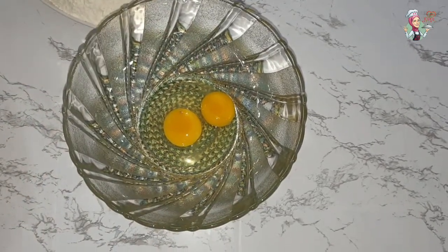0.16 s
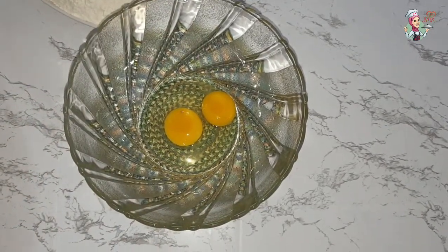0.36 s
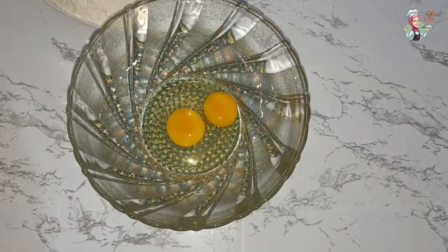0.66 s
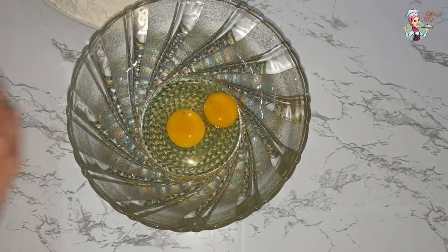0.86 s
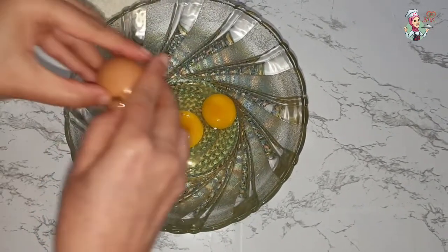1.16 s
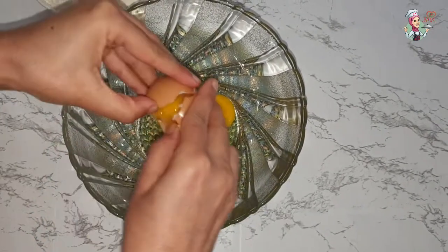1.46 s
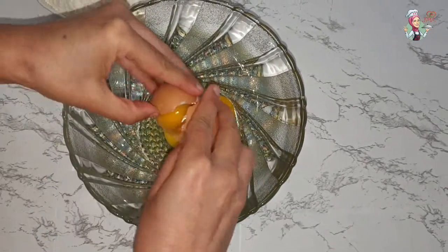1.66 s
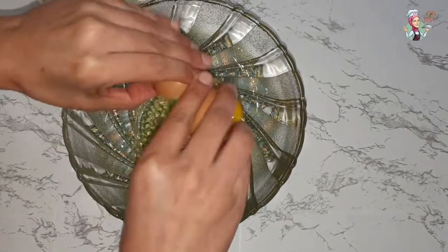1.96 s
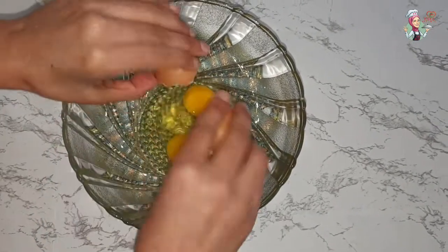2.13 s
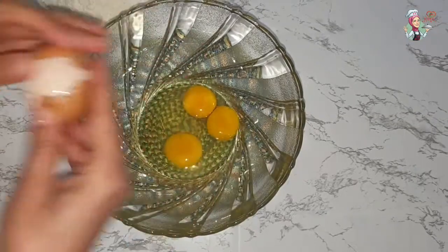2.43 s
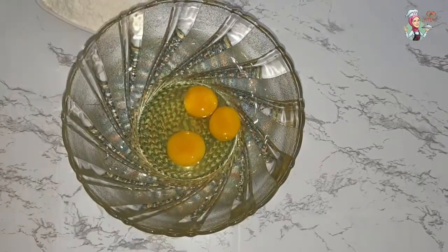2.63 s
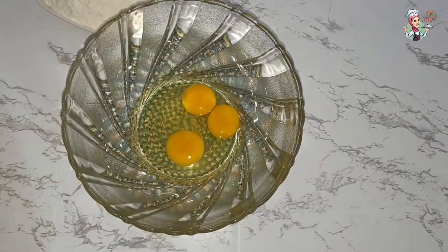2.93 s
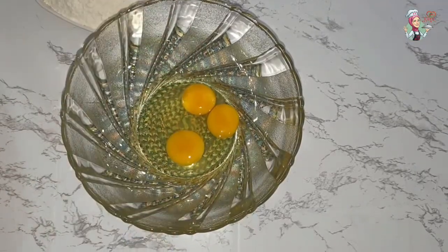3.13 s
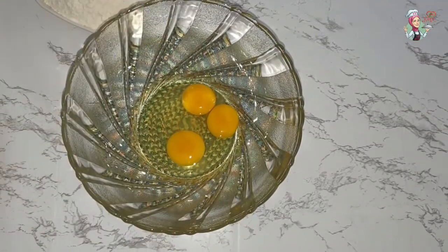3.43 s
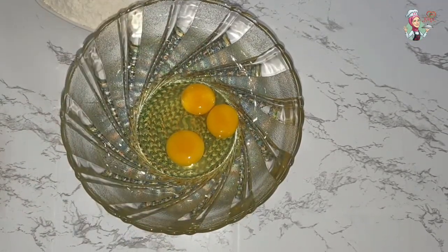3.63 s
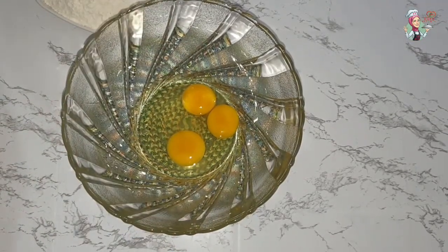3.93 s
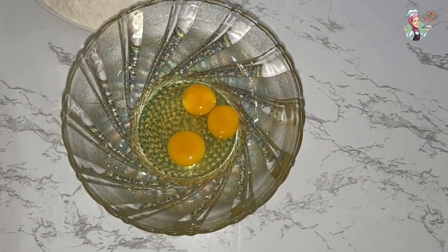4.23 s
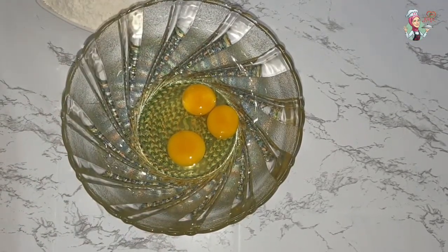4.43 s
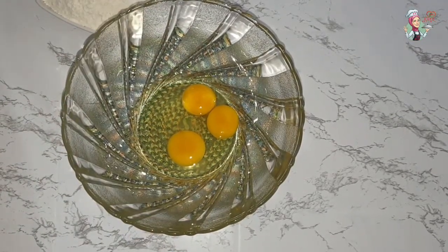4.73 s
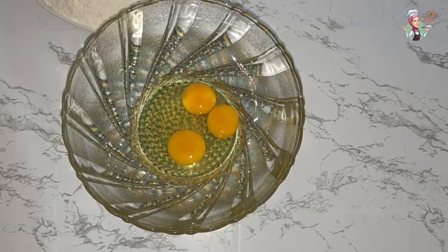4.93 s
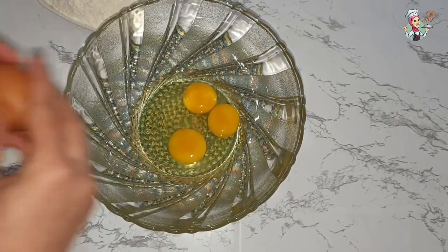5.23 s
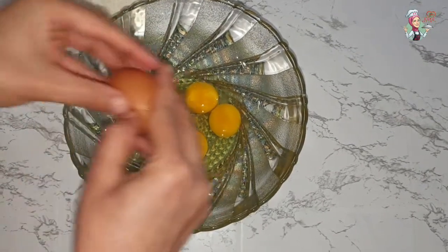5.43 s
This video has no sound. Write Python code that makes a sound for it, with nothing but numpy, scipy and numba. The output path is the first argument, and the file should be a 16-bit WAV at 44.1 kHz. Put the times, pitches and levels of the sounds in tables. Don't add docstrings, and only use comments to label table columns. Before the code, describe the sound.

Brittle close-up egg cracking in bursts with dry crackles, fading to small crunches, then three weakening taps on stone in a hard little kitchen.

```python
import sys
import numpy as np
from scipy import signal
from scipy.fft import rfft, irfft
from scipy.io import wavfile
from scipy.ndimage import uniform_filter1d
from numba import njit

SR = 44100
rng = np.random.default_rng(int(sys.argv[2]) if len(sys.argv) > 2 else 0)


def generate_wav(signal):
    frames = np.transpose(np.atleast_2d(signal))
    scaled = np.clip(frames, -1, 1) * 32767
    pcm = np.round(scaled).astype(np.int16)
    wavfile.write(sys.argv[1], SR, pcm)


def nominal_scale(level):
    x = np.asarray(level, float) / 20
    return 10 ** x


N = 246078
TIME = np.arange(N) / SR
COUNTER_HZ = (61, 124.7)
SHELL_EDGE_HZ = 2200


def unit(x):
    return x / np.sqrt(np.mean(x ** 2) + 1e-30)


def peak(x, db):
    return x * nominal_scale(db) / np.abs(x).max()


def colour(x, points):
    hz, db = np.transpose(points)
    axis_hz = np.fft.rfftfreq(x.shape[-1], 1 / SR) + 1
    gain = nominal_scale(np.interp(np.log(axis_hz), np.log(hz), db))
    return irfft(rfft(x) * gain, x.shape[-1])


@njit
def svf(x, hz, q):
    y, b, l = np.empty(len(x)), 0., 0.
    for i in range(len(x)):
        g = np.tan(np.pi * hz[i] / SR)
        v = (b + g * (x[i] - l)) / (1 + g * (g + 1 / q))
        b, l, y[i] = 2 * v - b, l + 2 * g * v, v / q
    return y


def band(x, hz, q):
    return svf(x + 1e-18, np.clip(hz * np.ones(len(x)), 20, .42 * SR), float(q))


def above(x, hz):
    return signal.sosfilt(signal.butter(4, hz, "high", fs=SR, output="sos"), x)


def waver(count, size):
    smooth = uniform_filter1d(rng.standard_normal(count), size=size)
    return unit(uniform_filter1d(smooth, size=size))


def swell(s, rise, fall, db):
    return nominal_scale(db - 29.5 * np.maximum((s - TIME) / rise, (TIME - s) / fall))


def add(out, s, sound):
    i = int(s * SR)
    sound = sound[:, :N - i]
    out[:, i:i + sound.shape[1]] += sound


# t/s, f/Hz
SHELL_RESONANCE = [(0.4, 1900), (0.54, 1404), (0.78, 2001), (1.4, 1600), (1.5, 2350), (1.75, 2520),
                   (2.1, 2150), (2.4, 1900), (2.72, 1680), (3.1, 1480), (3.25, 2170), (3.44, 1900),
                   (3.55, 2040), (3.68, 1900), (3.9, 1955), (4.05, 1900), (4.2, 2293), (5.5, 1830)]
# t/s, snap level/dB, shell body f/Hz, body level/dB
RINGING_BREAKS = [(0.392, -34.5, 1770, -34.5), (0.4026, -12, 1750, -11.5), (0.4898, -26.5, 1800, -22),
                  (0.508, -13.5, 1556, -11.5), (0.5196, -20.5, 1260, -12.5), (0.5292, -15.5, 1720, -17),
                  (0.5549, -13.5, 1670, -43), (0.5665, -16.5, 1420, -37), (0.5778, -18, 1430, -23),
                  (0.7536, -35, 2600, -33.5), (1.0201, -40, 896, -55), (1.057, -39, 866, -47),
                  (2.3621, -6.5, 1940, -23.5), (2.4014, -28.5, 1860, -37), (2.4173, -19, 1650, -23),
                  (2.4277, -16.5, 1780, -17.5), (2.7038, -17.5, 1624, -19.5), (2.7507, -13.5, 1666, -26),
                  (3.2127, -36, 1080, -22.5), (3.2214, -50, 1110, -22.5), (3.3665, -16.5, 2260, -44),
                  (3.4227, -28.5, 1650, -17.5), (3.532, -38, 2200, -32), (3.6601, -21.5, 1720, -35),
                  (3.8676, -23.5, 1690, -36), (4.041, -28.5, 2210, -42.5), (4.147, -28, 2040, -25),
                  (4.1544, -31, 2340, -34), (4.1889, -33, 1740, -38), (4.2398, -27.5, 2590, -33.5)]
# t/s, snap level/dB, snap centre f/Hz
OPEN_SPLINTERS = [(0.6841, -30, 12500), (1.982, -46, 8000), (2.137, -39.5, 6620), (1.0922, -33, 6540),
                  (1.1433, -30.5, 10830), (5.502, -43, 6500), (1.4386, -34.5, 7100), (1.457, -28.5, 8000),
                  (1.4846, -6.5, 10800), (1.4984, -11, 8950), (1.5107, -3, 7070), (1.5978, -25.5, 8850),
                  (1.6721, -37, 4400), (1.7231, -9.5, 7830), (1.7868, -36, 10100), (1.8126, -29.5, 10400),
                  (1.8387, -34, 3480), (1.8781, -38.5, 6050), (1.917, -30.5, 7780), (2.0237, -29, 6700),
                  (2.1163, -26, 7190), (2.3023, -34.5, 10870), (2.3895, -22.5, 9860), (2.4434, -11, 9900),
                  (2.4634, -19, 5200), (2.6187, -25, 11200), (2.6324, -22, 11100), (2.7321, -17, 9800),
                  (2.7607, -17.5, 5800), (3.949, -27, 5100)]


def cracks(out, kitchen):
    rows = []
    for s, snap_db, body_hz, body_db in RINGING_BREAKS:
        snap_hz = 5800 * np.exp(0.57 * rng.standard_normal())
        rows.append((s, snap_db, snap_hz, body_hz, body_db))
    for s, snap_db, snap_hz in OPEN_SPLINTERS:
        body_hz = np.interp(s, *np.transpose(SHELL_RESONANCE))
        rows.append((s, snap_db, snap_hz, body_hz, snap_db - 27.5))

    t = TIME[:1024]
    splitting = (np.exp(-t / .0004) + .12 * np.exp(-t / .004)) * (1 - np.exp(-t / .0003))
    for s, snap_db, snap_hz, body_hz, body_db in rows:
        fracture = rng.standard_normal(len(t)) * splitting
        snap = band(fracture, snap_hz, 2.1) + 0.27 * band(fracture, 8000, 0.85)
        snap = above(snap, SHELL_EDGE_HZ)
        ring = band(band(fracture, body_hz, 6), body_hz, 0.91)
        add(out, s, kitchen(peak(snap, snap_db + 8.5) + peak(ring, body_db + 10.0), s))


# t/s, length/s, crackle level/dB, body level/dB, hollow level/dB
CRUSHED = [(0.382, 0.012, -37.5, -40.5, -51.5), (0.51, .075, -33, -21, -20.5),
           (1.488, 0.025, -24.5, -58, -43), (2.622, 0.11, -41.5, -41.5, -67),
           (2.708, .065, -37, -25.5, -54)]
SQUEEZED = [(1.02, 0.16, -41.5, -85, -51.5), (1.285, .075, -50.5, -76.5, -61.5),
            (1.57, 0.087, -55.5, -37.5, -62), (2.368, .135, -23, -26.5, -35.5), (3.8, 0.22, -42, -41, -87),
            (0.8, 0.31, -57, -84.5, -71.5), (2.1, 0.14, -62, -50, -94)]
PEELED = [(0.403, .092, -39.5, -24.5, -39.5), (1.44, .036, -52, -73.5, -60), (1.675, .04, -32, -69, -67),
          (1.74, .2, -42, -39.5, -68), (0.755, .07, -57, -46, -55.5), (2.023, .17, -45.5, -47.5, -70.5),
          (2.303, .04, -57, -84.5, -81), (4.035, .045, -43, -29, -63), (4.146, .13, -45, -42, -40)]
GRIPPED = [(3.03, 0.23, -58.5, -68, -86), (3.213, 0.27, -30, -35.5, -39.5), (3.366, 0.079, -25.5, -22, -72),
           (3.47, .14, -34.5, -30, -39), (3.61, 0.16, -39.5, -46, -47.5), (5.41, 0.32, -61.5, -59, -82.5)]


def crunch(out, kitchen):
    swarms(out, kitchen, CRUSHED, start_db=-3.2, end_db=2.5, peak_at=.4, rate=4000, scatter_db=5.5)
    swarms(out, kitchen, SQUEEZED, start_db=-8.5, end_db=-11.5, peak_at=.43, rate=2500, scatter_db=6)
    swarms(out, kitchen, PEELED, start_db=-1, end_db=-11, peak_at=.11, rate=1500, scatter_db=6)
    swarms(out, kitchen, GRIPPED, start_db=-.25, end_db=-11, peak_at=1, rate=7000, scatter_db=4.5)


def swarms(out, kitchen, rows, start_db, end_db, peak_at, rate, scatter_db):
    for s, length, crackle_db, body_db, hollow_db in rows:
        t = np.arange(0, length, 1 / SR)
        n = len(t)
        sizes = nominal_scale(scatter_db * np.minimum(rng.exponential(size=n), 3.0))
        sizes = sizes * np.sign(rng.standard_normal(n))
        grains = unit((rng.random(n) < rate / SR) * sizes + 1e-9) + 0.033 * rng.standard_normal(n)

        crackle_hz = 6850 * np.exp(0.1 * waver(n, size=1200))
        crackle = band(grains, crackle_hz, 3.9) + 2.0 * band(band(grains, 5800, 0.3), 5300, 0.04)
        crackle = unit(above(crackle, SHELL_EDGE_HZ))
        crackle = crackle * nominal_scale(2 * waver(n, size=350))
        body_db = body_db + 2 * waver(n, size=600)

        body_hz = np.interp(s + t, *np.transpose(SHELL_RESONANCE))
        body_hz = body_hz * (1 + .08 * waver(n, size=500))
        body = band(grains, body_hz, 2.0) + 1.3 * band(grains, body_hz, 9)
        body = unit(band(body, body_hz, 1.7))
        hollow = unit(band(band(grains, 1080, 0.8), 1080, 0.97))

        edges = np.minimum(1, np.minimum(t, length - t) / 0.003)
        turns = [0, np.clip(peak_at, .02, .98), 1]
        effort = edges * nominal_scale(np.interp(t / length, turns, [start_db, 0, end_db]))
        layers = crackle * nominal_scale(crackle_db - 1.0) + body * nominal_scale(body_db - 4.0) + hollow * nominal_scale(hollow_db)
        add(out, s, kitchen(effort * layers, s))


# t/s, blow level/dB, shell f/Hz, bowl ring level/dB, brightness level/dB
EGG_TAPS = [
    (4.302, -5.5, 1790, 1.5, 0.5),
    (4.47, -8.5, 2300, -12, -3.5),
    (4.61, -10.5, 1800, -23.5, 3),
]
# f/Hz, width/Hz, level/dB, t60/s
BOWL_AND_SLAB = [(1229, 45, 2, 0.17), (900, 440, -0.5, 0.066), (498.4, 170, -26, 0.017),
                 (1900, 420, -16, 0.027)]
# f/Hz, level/dB
TICK_COLOUR = [(200, 4.5), (482, -28), (1210, 4), (2800, -11), (3690, -11), (5840, -11.5), (8740, -32),
               (16000, -33)]


def knocks(out, kitchen):
    t = TIME[:14000]
    push = np.exp(-t / 0.00074) + 0.081 * np.exp(-t / 0.029)
    for s, blow_db, shell_hz, ring_db, bright_db in EGG_TAPS:
        jolt = rng.standard_normal(len(t))
        hit = jolt * push
        tick = colour(jolt, [(100, -46.5)] + TICK_COLOUR + [(20000, -62.5)]) * push
        shell = band(hit, shell_hz, 5) + .8 * band(hit, 1.45 * shell_hz, 5)
        bright = band(band(hit, 6000, 2.0), 6000, 1.0) + .25 * band(hit, 12000, 1.5)
        ring = 0
        for hz, width_hz, db, t60 in BOWL_AND_SLAB:
            rough = 1.6 * unit(band(jolt, hz, hz / width_hz))
            ring = ring + nominal_scale(db - 60 * t / t60) * (np.sin(2 * np.pi * hz * t) + rough)
        thud = np.sin(2 * np.pi * COUNTER_HZ[0] * t) * np.exp(-t / 0.01)
        thud = band(thud, COUNTER_HZ[0], 0.7)
        blow = peak(tick, 3.2) + peak(shell, -1) + peak(bright, bright_db) + peak(ring, ring_db)
        thud_db = blow_db + 2 * ring_db - 31
        add(out, s, kitchen(above(blow, 110) * nominal_scale(blow_db) + thud * nominal_scale(thud_db), s))


# t/s, effort level/dB
HAND_EFFORT = [(0, -6), (0.36, -12.5), (0.56, 17.5), (0.73, -10), (1.0, 2), (1.5, 6), (1.68, -14.5),
               (1.8, -9), (2.3, -11.5), (2.45, 2), (2.9, -6), (3.21, 5), (3.47, 0), (3.55, 14), (3.95, 0.5),
               (4.63, 13.5), (4.85, -19.5), (5.58, 4)]
STIR_LEVEL = (-70, -75.5, -70)
STIR_GAIN = (0.13, .6, 1.0)
# t/s, rise/s, fall/s, low mode level/dB, second mode level/dB
HAND_LEANS = [(0.11, 0.18, 0.33, -52, -94), (2.43, 0.19, 0.25, -54, -70.5), (3.522, 0.0083, 0.23, -49, -48),
              (3.598, .08, 0.087, -44.5, -43.5), (4.175, .03, .12, -39.5, -36.5),
              (4.22, 0.046, .14, -40, -37), (4.312, .06, 0.044, -35, -43.5)]
# f/Hz, sharpness (Q), level/dB
SKIN_RUB = [(223, 0.83, 4.5), (330, 22, 1), (433, 11, -6)]


def shake():
    effort_db = np.interp(TIME, *np.transpose(HAND_EFFORT))
    *stirs, rub = (nominal_scale(db + gain * effort_db) for db, gain in zip(STIR_LEVEL, STIR_GAIN))
    out = 0
    for k, hz in enumerate(COUNTER_HZ):
        leans = sum(swell(s, rise, fall, dbs[k]) for s, rise, fall, *dbs in HAND_LEANS)
        mode_hz = hz * (1 + 0.12 * waver(N, size=1500))
        mode = unit(np.sin(2 * np.pi * np.cumsum(mode_hz) / SR))
        loose = [unit(band(band(rng.standard_normal(N), hz, 0.99), hz, 0.99)) for _ in range(2)]
        out = out + (stirs[k] + leans) * (mode + .6 * np.array(loose))
    skins = rng.standard_normal((2, N))
    mid, side = (unit(sum(nominal_scale(db) * unit(band(skin, hz, q)) for hz, q, db in SKIN_RUB)) for skin in skins)
    return out + rub * (mid + 0.13 * side * np.array([[1], [-1]]))


# t/s, rise/s, fall/s, slab f/Hz, level/dB
SLAB_DRAGS = [(0.571, 0.055, 0.087, 245, -38), (1.3, .3, .25, 270, -67.5),
              (2.799, 0.096, 0.056, 156, -57.5), (1.508, .02, .04, 420, -50.5),
              (0.54, .05, 0.07, 420, -42.5), (3.213, 0.027, 0.092, 210, -51.5), (3.76, .04, .2, 480, -60.5),
              (3.9, .14, 0.047, 435, -52), (1.9, .25, 0.31, 700, -68)]


def drags():
    out = 0
    for s, rise, fall, hz, db in SLAB_DRAGS:
        hum = band(band(rng.standard_normal(N), hz, 3.0), hz, 1.5)
        out = out + swell(s, rise, fall, db) * unit(hum)
    return out


# f/Hz, t60/s, tail level/dB
KITCHEN_TAIL = [(300, .26, -4), (800, .28, -4), (2000, .25, -5), (4000, .22, -5.5), (8000, .2, -5.5),
                (14000, .17, -6)]
# t/s, level/dB
NEAR_ECHOES = [(.0012, -8), (.003, -11), (.0055, -13), (.009, -15)]


def make_kitchen():
    t = TIME[:14000]
    air = rfft(rng.standard_normal(65536))
    axis = np.log(np.fft.rfftfreq(65536, 1 / SR) + 1)
    hz, t60s, dbs = np.transpose(KITCHEN_TAIL)
    bands = [irfft(air * np.interp(axis, np.log(hz), share)) for share in np.eye(len(hz))]
    build_up = 1 - np.exp(-t / .005)
    fades = [nominal_scale(db - 60 * t / t60) * np.sqrt(np.log(1e6) / t60 / SR) * build_up
             for t60, db in zip(t60s, dbs)]

    def kitchen(sound, when):
        lag_s = .0002 if 1.3 < when < 2.95 else .0004
        response = np.zeros((2, len(t)))
        for port, lag in enumerate((0, int(lag_s * SR))):
            response[port, lag] = nominal_scale(-3.3)
            for s, db in NEAR_ECHOES:
                delay = int(s * SR * rng.uniform(.7, 1.3))
                response[port, lag + delay] += nominal_scale(db) * rng.choice([-1, 1])
            start = rng.integers(len(bands[0]) - len(t))
            response[port] += sum(b[start:start + len(t)] * fade for b, fade in zip(bands, fades))
        return signal.fftconvolve(sound[None], response, axes=1) * nominal_scale(-3.5)
    return kitchen


# f/Hz, level/dB
FLOOR_COLOUR = [(15, -39.5), (25, -2), (161, 1.5), (335, -10.5), (600, -16.5), (1260, -14), (5000, -21),
                (16000, -15)]


def floor():
    return unit(colour(rng.standard_normal((2, N)), FLOOR_COLOUR)) * nominal_scale(-66.5)


def scene():
    egg, kitchen = np.zeros((2, N)), make_kitchen()
    for source in (cracks, crunch, knocks):
        source(egg, kitchen)
    lean = np.array([[.5], [-.5]])
    egg_left_db, shake_left_db = 3.1, 4
    return egg * nominal_scale(egg_left_db * lean) + (shake() + drags()) * nominal_scale(shake_left_db * lean) + floor()


def top_cut(x):
    return signal.sosfilt(signal.butter(12, 16510, fs=SR, output="sos"), x)


def record(dry):
    cut = signal.sosfilt(signal.ellip(5, .3, 35, 15500, fs=SR, output="sos"), dry)
    mix = np.clip(cut, -1, 1)
    return top_cut(mix)


dry = scene()
out = record(dry)
generate_wav(out)
```